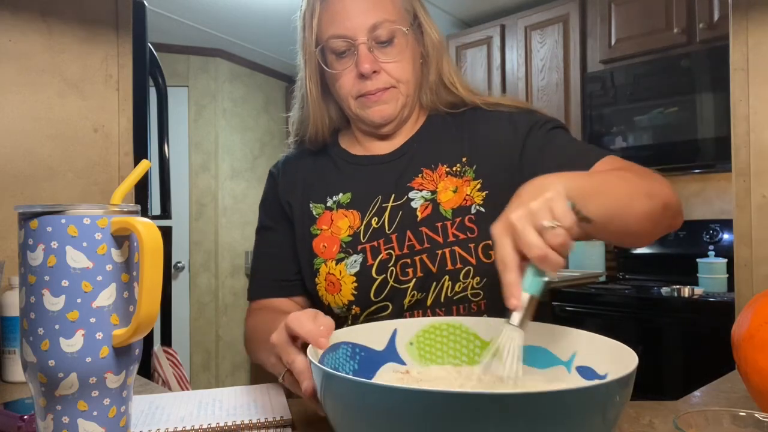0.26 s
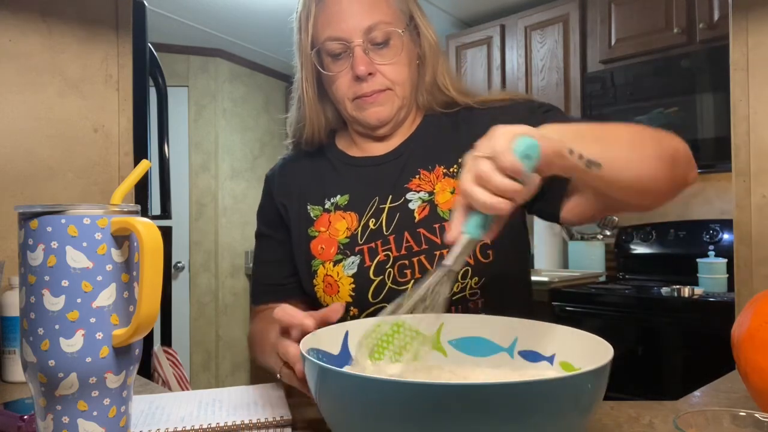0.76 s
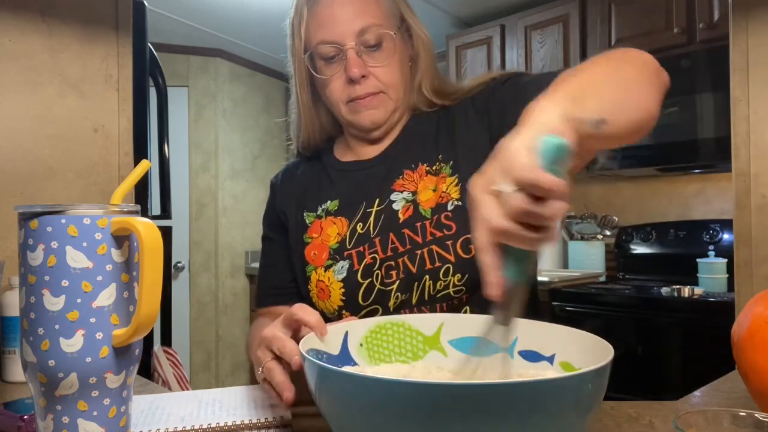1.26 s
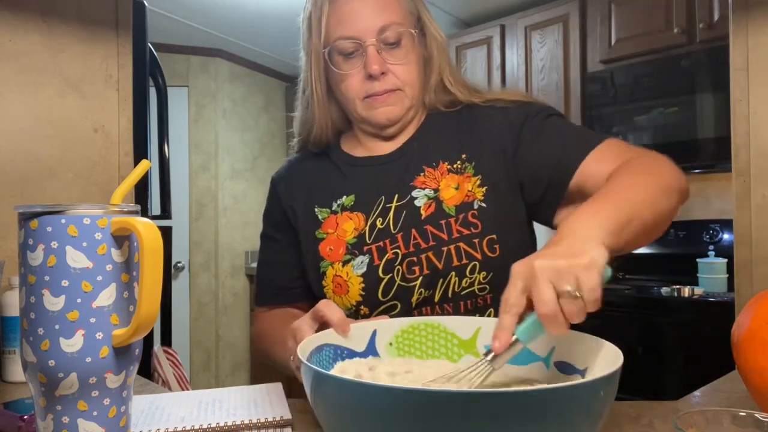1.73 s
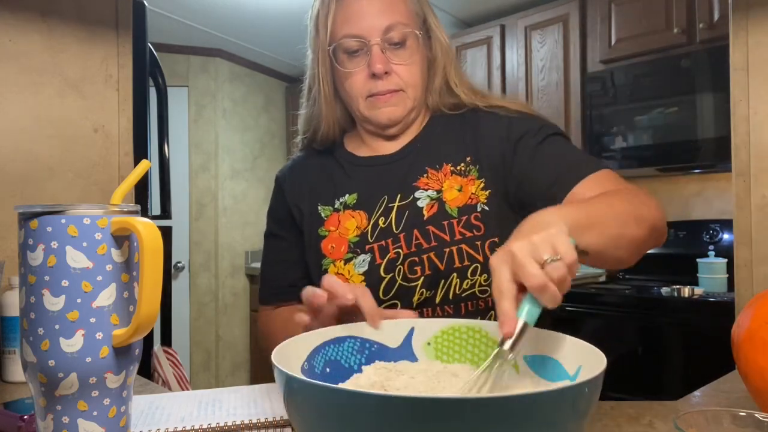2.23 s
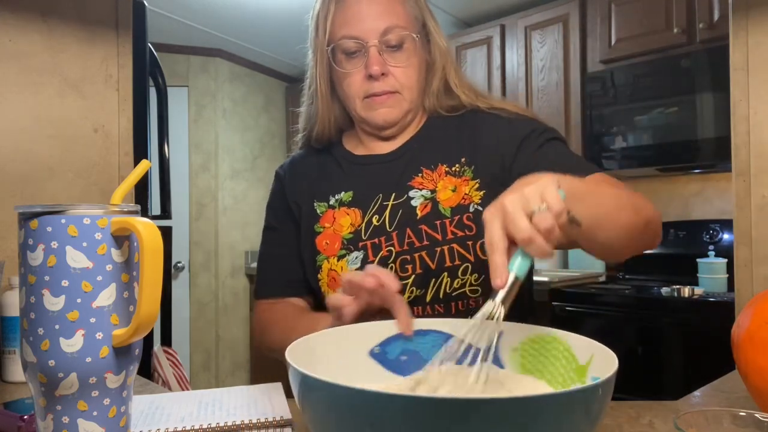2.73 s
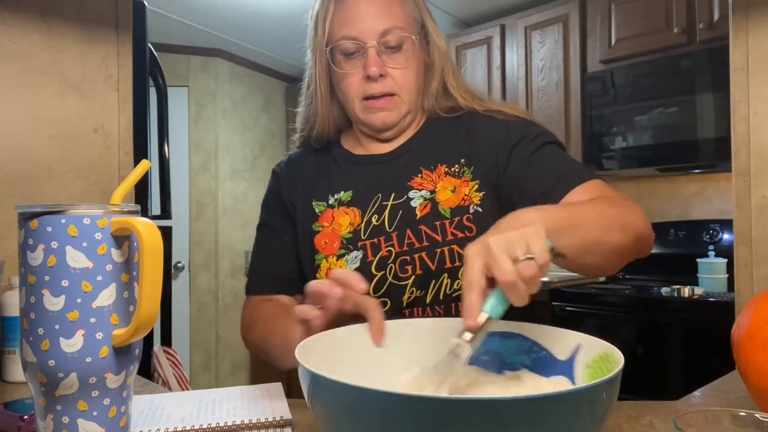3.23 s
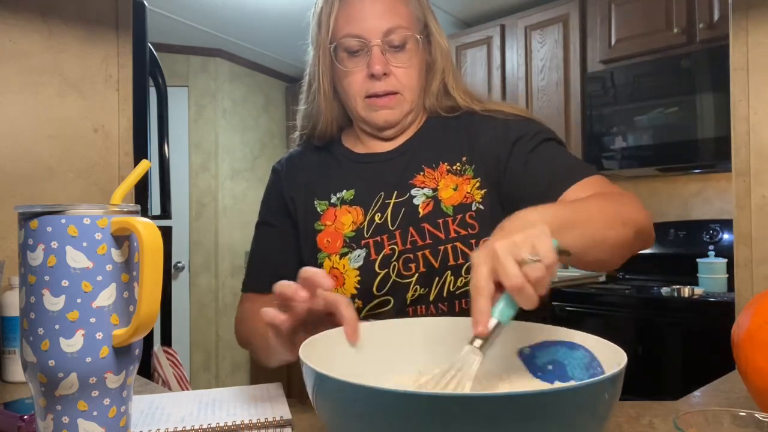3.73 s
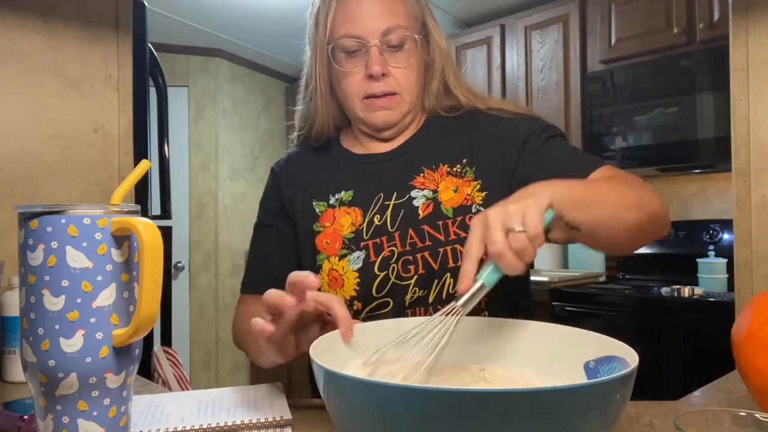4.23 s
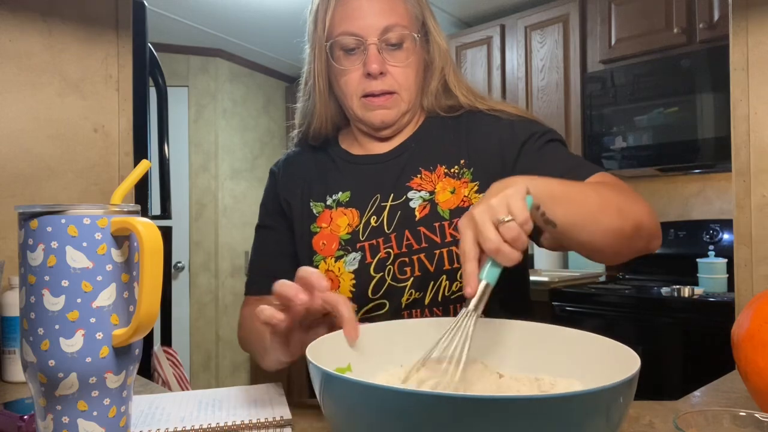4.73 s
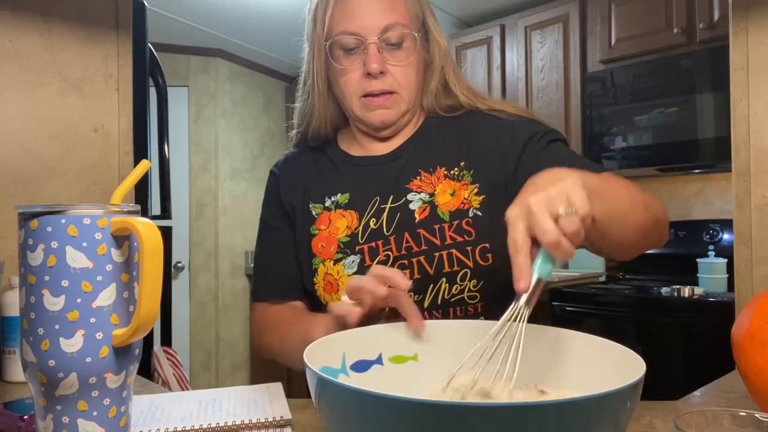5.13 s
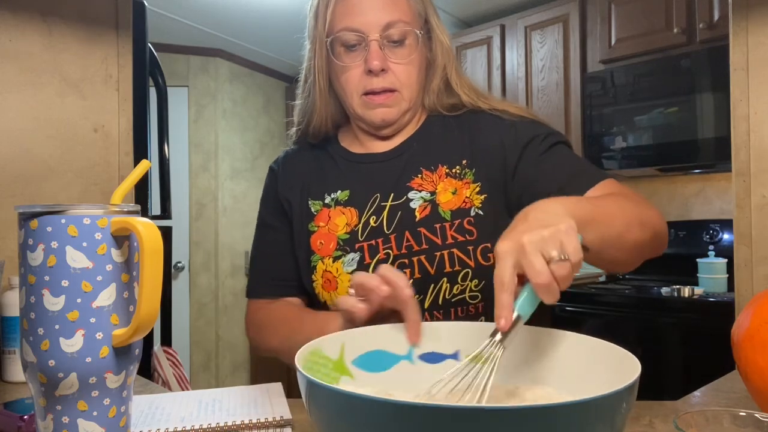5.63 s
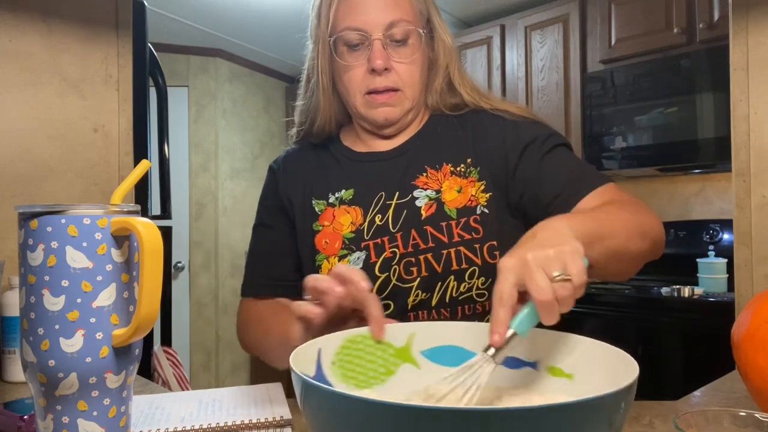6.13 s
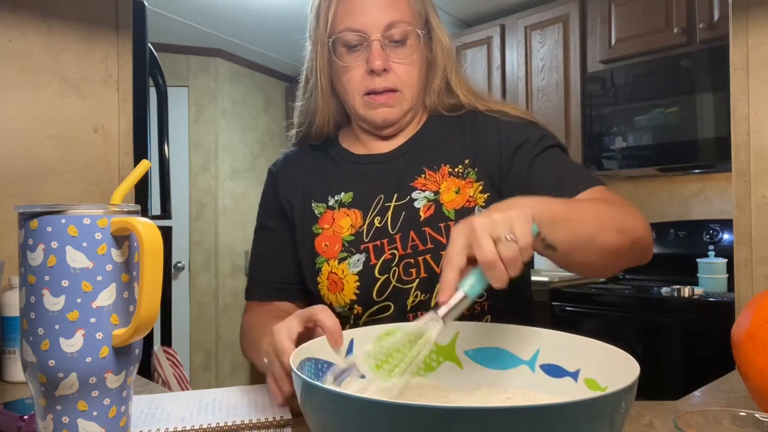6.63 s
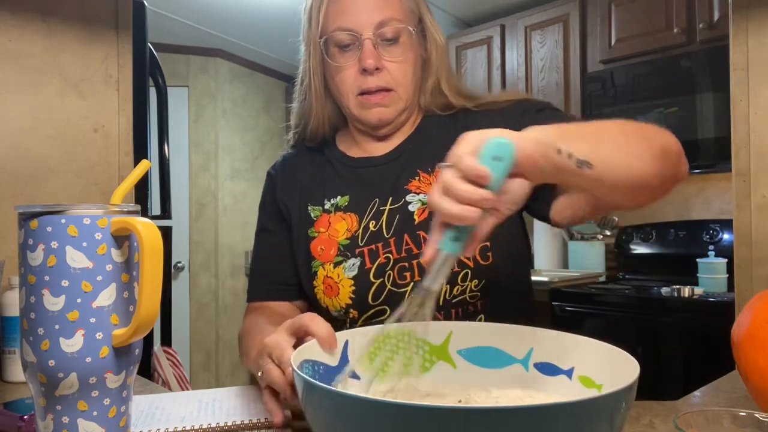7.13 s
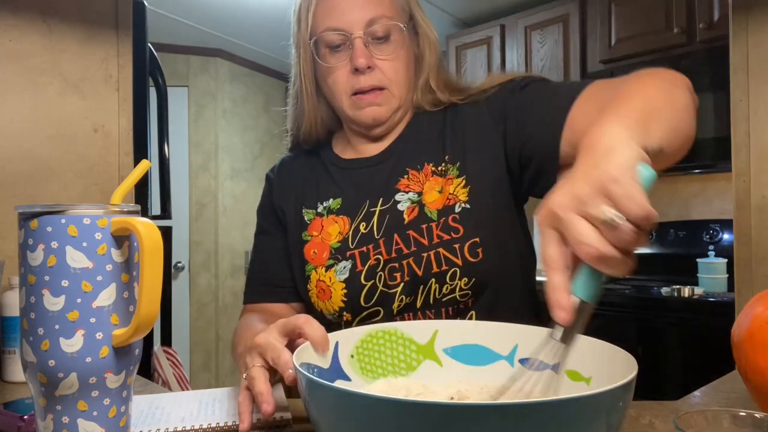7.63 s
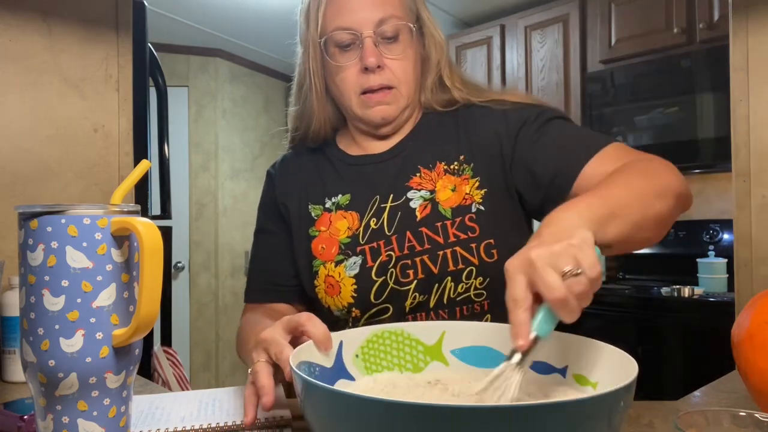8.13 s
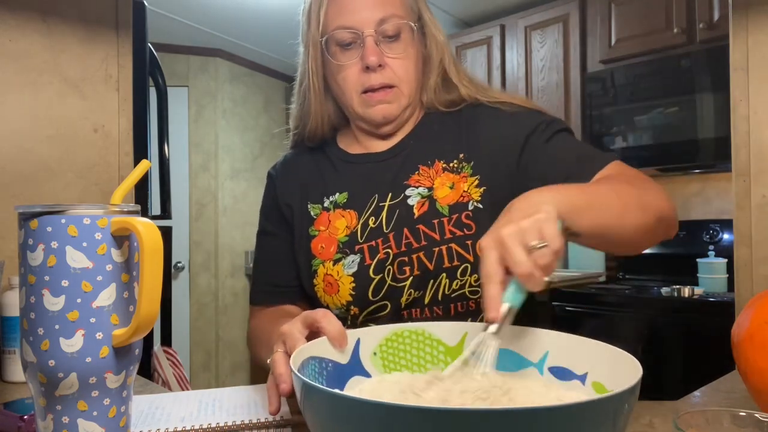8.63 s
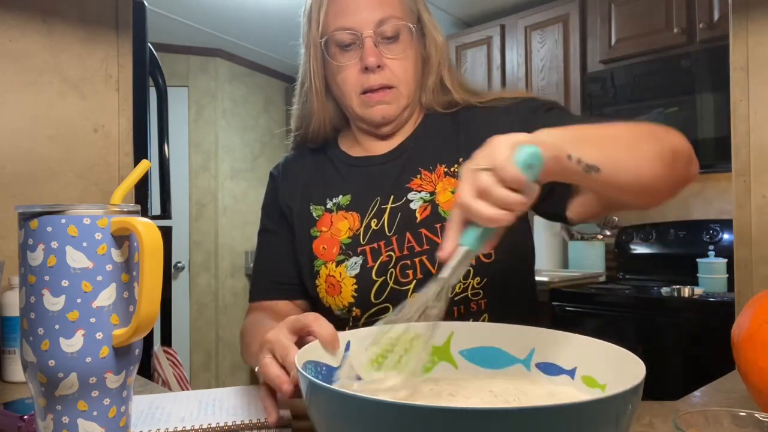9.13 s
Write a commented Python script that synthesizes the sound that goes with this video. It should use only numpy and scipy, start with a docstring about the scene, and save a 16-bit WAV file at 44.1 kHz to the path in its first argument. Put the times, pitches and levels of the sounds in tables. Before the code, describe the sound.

A wire whisk swishes round a large bowl of flour, crunching, tapping and ringing against the wall, over a low beating appliance hum.

```python
"""A wire whisk is drawn round a large bowl of flour on a kitchen counter, close to a two-port microphone.
Flour crunches and hisses as coloured slips; wire loops sing where they drag and clatter in struck modes.
Now and then the bowl shifts, two wires click together, or a loop skids or scratches along the bare wall.
Behind it an appliance rushes softly; its motor runs just under the mains frequency, so the hum slowly beats."""
import sys
import numpy as np
from scipy import signal
from scipy.fft import rfft, irfft, next_fast_len
from scipy.io import wavfile
from scipy.ndimage import uniform_filter1d

SR = 44100
rng = np.random.default_rng(int(sys.argv[2]) if len(sys.argv) > 2 else 0)


def master(y):
    """Save y as 16-bit WAV."""
    cut = np.clip(np.atleast_2d(y).T, -1, 1)
    pcm = np.round(cut * 32767)  # scale
    wavfile.write(sys.argv[1], SR, pcm.astype(np.int16))


N = 413216   # length in samples

# Modes of the wire loops. Each row: frequency in Hz, level in dB, undamped 60 dB decay in s.
WIRE_MODES = [(2620, -4.5, 0.15), (2797, -1.5, 0.22), (3010, -1, .14), (3107, -3, 0.11), (3305, 1, 0.11),
              (3606, -0.5, 0.22), (3746, -0.5, 0.25), (4210, -1.5, 0.08), (4650, -0.5, 0.039),
              (5710, -10.5, .05), (6430, -4.5, .05), (7180, -2, .056), (10500, 3, .025)]


def from_db(db):
    """Decibels to gain."""
    return 10 ** (np.asarray(db) / 20)


def rms_one(x):
    """Scale to an rms of 1."""
    return x / np.sqrt(np.mean(x ** 2) + 1e-20)


def at_hz(points, hz):
    """Read a curve of (Hz, value) points on a log-frequency axis."""
    point_hz, value = np.transpose(points)
    return np.interp(np.log(hz + 1e-9), np.log(point_hz), value)


def colour(x, spectrum):
    """Filter a signal by a spectrum in dB; rms 1."""
    size = next_fast_len(len(x))
    gain = from_db(at_hz(spectrum, np.fft.rfftfreq(size, 1 / SR)))
    return rms_one(irfft(rfft(x, size) * gain, size)[:len(x)])


def drift(rate):
    """Straight lines between normal random values, `rate` of them a second."""
    return np.interp(np.arange(N) / SR * rate, np.arange(N), rng.standard_normal(N))


def grains(per_s, spread_db, clump_db, clump_rate):
    """Tiny slips of uneven size whose strength swells in clumps."""
    at = np.flatnonzero(rng.random(N) < per_s / SR)
    chance = rng.random(N)[at]
    clumps = np.interp(at / SR * clump_rate, np.arange(N // 100), rng.standard_normal(N // 100))
    size_db = spread_db * np.minimum(-np.log(chance), 4)
    out = np.zeros(N)
    out[at] = (-1.) ** at * from_db(size_db + clump_db * clumps)
    return out


def ring(force, hz, t60):
    """One mode: a unit click sets a sine of height 1 ringing."""
    radius, turn = from_db(-60 / (t60 * SR)), 2 * np.pi * hz / SR
    return signal.lfilter([0, np.sin(turn)], [1, -2 * radius * np.cos(turn), radius * radius], force + 1e-18)


def swells(peak_s, rise_s, fall_s, level_db, size=64):
    """Gain of overlapping pushes: each builds to its hardest moment and eases off; their powers add."""
    edge_db = 10   # drop from the peak to the end of the rise or fall
    rise_power, fall_power = 1.89, 1.95   # roundness in dB: 1 pointed, 2 a bell
    t = np.arange(0, N + size, size) / SR
    since = t[:, None] - peak_s
    rising = np.abs(since / rise_s) ** rise_power
    falling = np.abs(since / fall_s) ** fall_power
    away = np.where(since < 0, rising, falling)
    power = np.sum(from_db(level_db - edge_db * away) ** 2, axis=1)
    return np.interp(np.arange(N) / SR, t, np.sqrt(power))


def shifting(x, depth_db, size=512, order=5):
    """The moving wires keep changing the colour: each narrow band swells and fades by itself; rms 1."""
    cells = signal.stft(x, nperseg=size)[2]
    patches = uniform_filter1d(rng.standard_normal(cells.shape), order, axis=0)
    patches = uniform_filter1d(patches, order, axis=1)
    moved = cells * from_db(depth_db * rms_one(patches))
    return rms_one(signal.istft(moved, nperseg=size)[1][:N])


def favoured(modes, near_hz, boost_db, width):
    """A body's modes, with those brought out that suit the place where it is touched."""
    return [(hz, db + boost_db * np.exp(-(np.log(hz / near_hz) / width) ** 2), t60) for hz, db, t60 in modes]


def detuned(modes, spread):
    """Grip and flour shift each mode a little from knock to knock."""
    return [(hz * np.exp(spread * rng.standard_normal()), db, t60) for hz, db, t60 in modes]


def struck(force, modes, uneven_db, damping=1, size=660):
    """A body's answer to one knock, each mode lifted by a random amount; rms 1 over the attack."""
    out = 0
    for hz, db, t60 in modes:
        mode = ring(force, hz, t60 * damping)
        out = out + from_db(db + uneven_db * rng.random()) * mode / mode[:size].std()
    return out / out[:size].std()


def hum(waver):
    """A mains tone and the harmonics of a slightly slower motor drift in and out of step."""
    # Motor harmonics. Each row: multiple of the motor frequency, level in dB rms.
    harmonics = [(1, -38), (2, -60.5), (3, -58), (4, -51), (5, -72.5), (6, -57.5), (7, -64)]
    mains_hz, mains_db = 59.995, -34.5   # level in dB rms
    motor_hz, in_step_s = 59.345, .6   # in step near this moment, give or take the waver
    t = np.arange(N) / SR - in_step_s
    turn = 2 * np.pi * motor_hz * t + waver * drift(5.4)
    motor = sum(from_db(db) * np.cos(round(k) * turn) for k, db in harmonics)
    mains = from_db(mains_db) * np.cos(2 * np.pi * mains_hz * t)
    return np.sqrt(2) * (motor + mains)


def appliance_rush(level_db):
    """The steady rush of the appliance across the kitchen: coloured noise."""
    # Each row: frequency in Hz, relative level in dB per Hz.
    rush_spectrum = [(20, -15), (50, 3.5), (85, 0.5), (120, -4), (200, -7.5), (300, -11), (400, -11),
                     (560, -24), (850, -21.5), (1300, -36), (2200, -45), (6000, -73), (12000, -45),
                     (13800, -38), (14500, -66.5)]
    return from_db(level_db) * colour(rng.standard_normal(N), rush_spectrum)


def stirring():
    """How hard strokes and bowl shifts drive the crunch, the hiss, the wires and the bowl, as gains."""
    # The whisk is pushed through the flour. Each row: hardest moment, rise and fall in seconds,
    # then levels in dB: crunch of packed flour, hiss of sliding, singing of the wires.
    strokes = [ (.06, 0.066, 0.15, -47, -39.5, -43.5), (.38, 0.13, 0.14, -30, -36, -37),
               (1.0, 0.11, 0.34, -42.5, -46.5, -52), (1.2, 0.2, 0.16, -52, -33.5, -30.5),
               (1.38, 0.14, 0.28, -45, -39, -46), (1.56, 0.039, 0.076, -34.5, -34, -47),
               (1.68, 0.095, 0.13, -34.5, -46, -43), (1.83, 0.27, 0.11, -46, -41, -42),
               (2.02, 0.065, 0.11, -35.5, -38, -52), (2.18, 0.091, 0.05, -34, -38, -40.5),
               (2.37, 0.23, 0.09, -51.5, -42.5, -67), (2.55, 0.12, 0.18, -38, -37, -42),
               (2.76, 0.21, 0.15, -37, -48.5, -46), (3.07, 0.047, 0.13, -36, -33.5, -35.5),
               (3.27, 0.22, 0.075, -36, -48, -48), (3.42, 0.2, 0.056, -37.5, -43, -47),
               (3.56, 0.079, 0.11, -56, -43.5, -63), (3.73, 0.13, 0.11, -33.5, -39.5, -41),
               (3.91, 0.16, 0.081, -37, -46, -47.5), (4.08, 0.042, 0.046, -75, -57, -70),
               (4.231, 0.059, 0.1, -36.5, -31.5, -38.5), (4.38, 0.17, 0.18, -34.5, -42, -41.5),
               (4.7, 0.067, 0.47, -58, -44, -70), (4.92, 0.1, .14, -32, -41, -39),
               (5.27, 0.02, 0.09, -75, -56.5, -80), (5.43, 0.077, 0.078, -40, -37, -47),
               (5.48, 0.073, 0.16, -33, -40.5, -40.5), (5.69, 0.12, 0.094, -36.5, -46.5, -48),
               (5.89, 0.051, 0.24, -49, -42.5, -55), (6.01, 0.064, 0.14, -36, -38, -46),
               (6.11, 0.086, 0.15, -32.5, -40, -40.5), (6.44, 0.12, 0.082, -68, -54, -76),
               (6.61, 0.032, 0.059, -49.5, -38, -57), (6.72, 0.047, 0.12, -73, -58.5, -65.5),
               (7.17, 0.13, 0.18, -46, -81, -77), (7.38, 0.19, .1, -62, -46.5, -47.5),
               (7.52, 0.14, 0.19, -50.5, -35.5, -36.5), (7.72, 0.22, 0.28, -56, -42.5, -45),
               (7.95, 0.13, 0.18, -47.5, -45.5, -63), (8.15, 0.044, 0.05, -44.5, -39.5, -44.5),
               (8.32, 0.21, 0.11, -44.5, -53, -67), (8.57, 0.98, 0.18, -48.5, -40.5, -65),
               (8.82, 0.17, 0.062, -45, -38, -48), (8.98, 0.09, 0.15, -49.5, -68, -82),
               (9.14, 0.13, 0.17, -42, -52, -72), (9.351, 0.08, 0.086, -61, -40.5, -40.5)]
    # The bowl shifts on the counter. Each row: loudest moment, rise and fall in seconds, level in dB.
    bowl_shifts = [(.04, 0.025, 0.052, -37.5), (0.551, .06, 0.029, -43), (2.25, 0.054, 0.064, -45),
                   (2.77, 0.066, 0.068, -40), (3.31, .03, 0.037, -41), (3.52, 0.086, 0.096, -45),
                   (3.88, 0.16, 0.051, -47), (4.61, .1, 0.11, -41), (4.8, 0.028, 0.042, -38),
                   (5.04, 0.061, 0.12, -37), (5.96, 0.086, 0.044, -44), (6.13, 0.028, 0.025, -35),
                   (6.24, 0.022, 0.044, -34.5)]
    # How much the bowl shakes with the crunch, less while a hand holds it down.
    # Each row: time in seconds, level against the crunch in dB.
    looseness = [(.5, -12), (1.5, -12.5), (2.6, -4), (3.3, -7.5), (3.8, -3), (4.3, -2.5), (6.2, -3.5),
                 (7.2, 1), (8.3, -2.5), (9.2, -3.5)]
    hiss_lead_s = 0.006   # the wires slide through loose flour before they reach the packed flour
    rumble_lag_s = 0.0051   # the bowl answers a little after the crunch
    resting_crunch_db, resting_hiss_db = -68, -68.5   # between strokes the flour goes on settling
    s, rise, fall, crunch_db, hiss_db, wire_db = np.transpose(strokes)
    crunch = np.hypot(swells(s, rise, fall, crunch_db), from_db(resting_crunch_db))
    hiss = np.hypot(swells(s - hiss_lead_s, rise, fall, hiss_db), from_db(resting_hiss_db))
    wires = swells(s, rise, fall, wire_db)
    shaken_db = crunch_db + np.interp(s, *np.transpose(looseness))
    shaken = swells(s + rumble_lag_s, rise, fall, shaken_db)
    rumble = np.hypot(shaken, swells(*np.transpose(bowl_shifts)))
    return crunch, hiss, wires, rumble


def flour(crunch_gain, hiss_gain, rumble_gain):
    """Packed flour slips coarsely and shakes the bowl; loose flour hisses in fine slips, thinner if light."""
    # Spectra of packed flour, loose flour and bowl. Each row: frequency in Hz, relative level in dB per Hz.
    crunch_spectrum = [(150, 8.5), (300, 1.5), (450, 5.5), (600, 6), (800, 5), (1050, 5), (1400, -4),
                       (2000, -6), (3000, -5), (6000, -12.5), (13800, -46.5), (14500, -52.5)]
    hiss_spectrum = [(700, -48.5), (1500, -3.5), (2200, 2), (3300, 3.5), (5000, 4.5), (6300, 0.5),
                     (8300, 10), (10000, 4), (12000, 5.5), (13800, 5), (15400, -9), (16000, -28)]
    rumble_spectrum = [(60, -47), (100, -31), (138, 3), (195, -10), (255, -5.5), (320, -12), (480, -15.5),
                       (1000, -51.5)]
    # a light touch moves only the finest flour: the lower hiss loses this many more dB per dB
    fine_above_hz, firm_hiss_db, coarse_growth = 11000, -42.5, 0.25
    crunch = colour(grains(per_s=1100, spread_db=1.0, clump_db=1.5, clump_rate=90), crunch_spectrum)
    crunch = shifting(crunch, depth_db=3.0)
    rumble = colour(grains(per_s=760, spread_db=1.5, clump_db=5.0, clump_rate=27), rumble_spectrum)
    hiss = colour(grains(per_s=4500, spread_db=1.0, clump_db=1.5, clump_rate=90), hiss_spectrum)
    hiss = shifting(hiss, depth_db=4.5)
    coarse = signal.sosfiltfilt(signal.butter(2, fine_above_hz, fs=SR, output="sos"), hiss)
    fine = hiss - coarse
    hiss = fine + coarse * (hiss_gain / from_db(firm_hiss_db)) ** coarse_growth
    return crunch_gain * crunch + rumble_gain * rumble + hiss_gain * hiss


def singing_wires(damping, wander_db, bend):
    """Loops catch on the wall one by one and ring, damped by flour, pitch wandering as they bend; rms 1."""
    out = 0
    for hz, mode_db, t60 in WIRE_MODES:
        slips = grains(per_s=600, spread_db=2.0, clump_db=wander_db, clump_rate=45)
        mode = ring(slips, hz, t60 * damping)
        flexed = np.cumsum(1 + bend * drift(14)) % N   # uneven reading speed bends the pitch
        out = out + from_db(mode_db) * rms_one(np.interp(flexed, np.arange(N), mode))
    chatter = from_db(2.9 * drift(140))   # the whole whisk judders as it drags
    return rms_one(out * chatter)


def taps(clatter_s, size=8192):
    """The loops land within milliseconds and rattle on: a tick, ringing wires and wall, and a thump."""
    # The whisk knocks the bowl. Each row: start in seconds, levels in dB of tick, thump, wall ring and
    # wire ring, then pitches in Hz of the thump, of the wall where it is hit and of the loop that lands.
    knocks = [(0.027, -35, -33.5, -40, -38, 120, 1070, 2640), (0.3648, -47, -25, -37, -33, 310, 920, 3120),
              (0.4481, -28, -55, -39, -31.5, 265, 760, 3300),
              (0.8629, -15, -53, -28.5, -19.5, 265, 1200, 3010),
              (0.8705, -26, -28.5, -28, -25.5, 130, 665, 3000),
              (0.9698, -34, -36, -34.5, -33.5, 170, 664, 3110),
              (1.424, -40, -47, -55, -30.5, 169, 920, 2750),
              (2.4476, -19.5, -57, -32, -29.5, 360, 1060, 3040),
              (2.4634, -21, -30, -36, -50, 265, 1870, 2800), (2.5111, -28, -36, -37, -50, 265, 920, 2630),
              (2.528, -41, -44, -29, -44, 171, 633, 3760), (3.0018, -25, -50, -27.5, -32.5, 190, 707, 3270),
              (3.0092, -19, -30, -25, -24.5, 230, 637, 3230),
              (3.0162, -31, -48, -39, -26.5, 230, 1050, 3610),
              (3.5171, -44, -38, -50, -40.5, 170, 620, 3720),
              (4.1285, -27.5, -46, -37.5, -40, 170, 1870, 3160),
              (4.1341, -48, -26.5, -31, -33.5, 265, 590, 3300),
              (4.6804, -53, -47, -45, -44, 265, 615, 3360),
              (5.317, -27, -34.5, -39, -37, 170.3, 2370, 3255),
              (5.3227, -42, -28, -36, -38, 260, 640, 3290), (5.3948, -28, -44, -54, -39, 170, 920, 3240),
              (5.84, -38, -32, -40, -43, 290, 655, 3210), (5.9813, -25, -32.5, -32.5, -34, 265, 1870, 3590),
              (5.999, -23.5, -34, -37, -43, 170, 740, 2740), (6.564, -33, -44, -49, -41, 265, 660, 2900),
              (6.574, -31, -40, -48, -36.5, 265, 660, 2920), (7.17, -36.5, -42, -40, -43.5, 265, 660, 2850),
              (7.492, -25.5, -60, -53, -44, 265, 1200, 3340), (7.554, -24, -63, -51, -43, 265, 1060, 3120),
              (7.5765, -29, -62, -51, -37, 265, 1200, 2660),
              (7.7003, -29, -44, -36.5, -32, 265, 1050, 3100),
              (9.166, -26.5, -48, -36, -42, 190, 920, 3020),
              (9.1809, -30, -28.5, -33, -36, 360, 1060, 3010),
              (9.189, -45, -26, -53, -35.5, 105, 1200, 3010)]
    # The bowl rocking on the counter, then its wall.
    # Each row: frequency in Hz, level in dB, undamped 60 dB decay in s.
    base_modes = [(83, -5.5, 0.22), (130.2, 1, 0.26), (169.7, -6, 0.32), (262, 0, 0.13), (294, 2.5, 0.11),
                  (364, -9, 0.147)]
    wall_modes = [(543, -18.5, .07), (577, -5.5, .07), (614, -4.5, 0.08), (671, -3.5, 0.083),
                  (777, -9.5, .05), (925, -7, 0.15), (1032, -2.5, 0.071), (1230, -12, .06), (1255, -9, .06),
                  (1430, -6.5, 0.043), (1873, -6.5, 0.04), (2360, -10, .08)]
    # The loop that lands rings above the others.
    # Each row: multiple of its pitch, level in dB, undamped 60 dB decay in s.
    loop_modes = [(1.001, 13, 0.056), (1.035, -7, 0.2), (1.95, 1, .06), (2.034, 6, 0.089), (3.58, 0, 0.06)]
    # Each row: frequency in Hz, relative level in dB per Hz.
    tick_spectrum = [(300, -39), (1000, 0.5), (2200, -21), (3000, 6.5), (4200, 3.5), (5300, 2.5), (6100, 0),
                     (7300, -0.5), (8500, 11), (10700, 3.5), (13000, 0.5), (16000, -2)]
    tick_decay_s = 0.0074
    rattle_db, rattle_s = -26.5, .028   # the loops go on bouncing lightly after a knock
    hard_tap_db, overtone_growth = -21.5, 1.7   # a softer landing loses overtones: dB per dB and octave
    out, t = np.zeros(N + size), np.arange(size) / SR
    bouncing = np.exp(-t / clatter_s) + from_db(rattle_db) * np.exp(-t / rattle_s)
    for s, tick_db, thump_db, wall_db, wire_db, thump_hz, wall_hz, loop_hz in knocks:
        clatter = rng.standard_normal(size) ** 3 * bouncing   # cubing makes sparse strong hits
        tilt_db = overtone_growth * (wire_db - hard_tap_db)
        loop = [(k * loop_hz, db + tilt_db * np.log2(k), t60) for k, db, t60 in loop_modes]
        wires = loop + detuned(WIRE_MODES, spread=.009)
        wall = detuned(favoured(wall_modes, wall_hz, boost_db=13.5, width=0.17), spread=.012)
        base = favoured(base_modes, thump_hz, boost_db=10.5, width=0.38)
        tick = colour(rng.standard_normal(size), tick_spectrum) * np.exp(-t / tick_decay_s)
        knock = from_db(tick_db) * tick
        knock += from_db(thump_db) * struck(clatter, base, uneven_db=0.0, damping=.85)
        knock += from_db(wall_db) * struck(clatter, wall, uneven_db=4.5, damping=0.9)
        knock += from_db(wire_db) * struck(clatter, wires, uneven_db=1.0, damping=0.76)
        start = int(s * SR)
        out[start:start + size] += knock
    return out[:N]


def clicks(size=2048):
    """Wire meets wire in one short bright tick that leaves the bowl still."""
    # Each row: start in seconds, level in dB, centre of the tick in Hz, decay in seconds.
    wire_contacts = [(0.35, -13, 7460, .0008), (0.8702, -11, 12000, .0016), (2.5178, -22, 9500, .0013),
                     (2.859, -28, 10500, 0.0029), (2.866, -31, 3500, .002), (3.0113, -18, 5700, .0022),
                     (3.952, -32, 11000, .0013), (5.396, -28, 7500, .002), (6.502, -43, 12500, 0.0025),
                     (6.5125, -42, 4940, 0.0021), (7.2265, -25, 9500, 0.0035), (8.282, -25, 9000, 0.0022)]
    # Spectrum of a click. Each row: multiple of its centre, relative level in dB.
    click_spectrum = [(.08, -25), (.3, -7.5), (.7, -1.5), (1, -2.5), (1.6, -7), (3, -12)]
    out, t = np.zeros(N + size), np.arange(size) / SR
    for s, db, centre_hz, decay_s in wire_contacts:
        spectrum = [(k * centre_hz, level_db) for k, level_db in click_spectrum]
        tick = colour(rng.standard_normal(size), spectrum)
        start = int(s * SR)
        out[start:start + size] += from_db(db) * tick * np.exp(-t / decay_s)
    return out[:N]


def skids(jitter, slowing, judder_db, uneven_db, size=4096, count=40):
    """On the bare wall a wire sticks and slips in a juddering rasp, its rate sinking as the loop unbends."""
    # A wire skids over the bare wall. Each row: start and length in seconds, level in dB, rasp pitch in Hz.
    wall_skids = [(1.148, .006, -23, 2950), (1.163, 0.0072, -29, 3030), (1.173, 0.0055, -27, 3000),
                  (1.196, .014, -24.5, 2860), (1.212, 0.0056, -21.5, 2900), (1.234, 0.014, -24, 2800),
                  (1.255, 0.0052, -24, 2700), (1.268, 0.0055, -23, 2810), (1.326, 0.013, -26.5, 2600),
                  (1.37, .005, -30, 2900), (1.393, 0.005, -31, 3200), (1.451, 0.013, -34, 2880),
                  (1.866, 0.012, -48, 1930), (2.004, 0.0082, -43, 2370), (2.177, 0.028, -41, 2920),
                  (7.355, 0.0079, -46, 2900), (7.458, 0.012, -34, 2970), (7.485, 0.012, -29, 3200),
                  (7.549, 0.015, -27, 2380), (7.575, 0.0079, -33, 2500), (7.602, 0.013, -29, 2700),
                  (7.638, 0.0089, -30, 3160), (7.686, 0.01, -32, 2850), (7.698, 0.0061, -41, 1500),
                  (7.733, 0.012, -32, 3000), (7.743, 0.0098, -39, 2920), (7.797, 0.013, -32.5, 2480),
                  (7.81, 0.0089, -43, 1440), (7.928, 0.012, -45, 1480), (8.075, 0.012, -41.5, 1400),
                  (8.136, 0.0093, -33, 3450), (8.152, .012, -30, 3540), (8.166, 0.012, -38, 3550),
                  (8.281, 0.011, -37, 1320), (8.403, 0.013, -39.5, 1550), (8.444, .026, -38, 3500),
                  (8.522, 0.013, -33.5, 3620), (8.541, 0.0088, -38, 2900), (8.594, 0.021, -38, 1300),
                  (8.62, 0.013, -38, 1180), (8.648, 0.013, -42.5, 1130), (8.684, .012, -51, 1980),
                  (8.718, .012, -44, 1910), (8.739, 0.013, -45, 900), (8.753, 0.0095, -39, 1560),
                  (8.803, 0.015, -30.5, 1890), (8.855, 0.016, -41, 1940)]
    # A skidding wire. Each row: frequency in Hz, relative level in dB per Hz.
    scratch_spectrum = [(400, -15), (700, 13), (1200, 4.5), (2400, 2), (3700, 10), (4600, -0.5),
                        (9000, -18), (16000, -36)]
    # The peak of a rasp. Each row: multiple of its pitch, relative level in dB.
    rasp_peak = [(.22, -17), (.5, -22), (.84, -7), (.96, 3.5), (1.04, 6), (1.16, -7), (1.8, -6), (2.05, -7),
                 (2.4, -11.5)]
    attack_s, ring_s = .0015, 0.0037   # the wire bites, and rings on after it lets go
    slip_hz, slip_spread = 649.5, .18   # typical stick-slip rate; its spread between skids as a share
    out, t = np.zeros(N + size), np.arange(size) / SR
    bands = np.geomspace(500, 7000, count)   # Hz
    for s, length, db, rasp_hz in wall_skids:
        along = np.minimum(t / length, 1)
        wobble, judder = rms_one(uniform_filter1d(rng.standard_normal((2, size)), size=70))
        rate = slip_hz * np.exp(slip_spread * rng.standard_normal() + jitter * wobble - slowing * along)
        slips = np.diff(np.floor(np.cumsum(rate) / SR), prepend=0)   # one click a cycle
        slips = slips * from_db(judder_db * judder)
        # each spot on the wall rings in its own way
        spot_db = at_hz(rasp_peak, bands / rasp_hz) + uneven_db * rng.standard_normal(count)
        rasp = colour(colour(slips, scratch_spectrum), list(zip(bands, spot_db)))
        rasp *= np.minimum(t / attack_s, 1) * np.exp(-np.maximum(t - length, 0) / ring_s)
        start = int(s * SR)
        out[start:start + size] += from_db(db) * rasp / rasp[along < 1].std()
    return out[:N]


def dragging():
    """Grit caught between wire and wall scratches in bunches of slips that set the wall ringing."""
    # The loops drag along the bare wall. Each row: hardest moment, rise and fall in seconds, level in dB.
    drags = [(7.59, .13, 0.11, -49), (8.15, 0.043, .06, -40), (8.28, .035, 0.059, -45.5),
             (8.45, .1, 0.13, -52), (8.62, 0.062, 0.062, -46), (8.78, 0.11, 0.078, -48)]
    # What sings under a dragging loop. Each row: frequency in Hz, level in dB, 60 dB decay in s.
    drag_modes = [(625, -2, .04), (912, -9, .06), (1090, -4, 0.055), (1240, 0, 0.036), (1395, 3.5, 0.046),
                  (1966, 2, 0.044), (2143, 3, 0.07), (2520, 3, .03), (3010, 0, 0.044), (3480, -1, .04),
                  (3650, -1, 0.044)]
    slips = grains(per_s=700, spread_db=3.0, clump_db=7.0, clump_rate=110)
    wall = 0
    for k, (hz, db, t60) in enumerate(drag_modes):
        wall = wall + (-1) ** k * from_db(db) * rms_one(ring(slips, hz, t60))
    return swells(*np.transpose(drags)) * rms_one(wall)


def whisk(crunch_gain, hiss_gain, wire_gain, rumble_gain):
    """What the whisk does in the bowl, all but the skids, as heard along one path."""
    sliding = flour(crunch_gain, hiss_gain, rumble_gain)
    singing = wire_gain * singing_wires(damping=0.22, wander_db=7.0, bend=.025)
    return sliding + singing + dragging() + taps(clatter_s=0.0066) + clicks()


def two_ports(direct, scattered):
    """Direct sound reaches the two ports out of phase; what the bowl scatters differs at each of them."""
    # Phase by which the left port leads. Each row: frequency in Hz, phase in radians.
    port_phase = [(20, 0), (150, .05), (450, 1.1), (900, 1.15), (1650, 0), (2600, 2.2), (3300, 2.5),
                  (5200, 2.5), (6000, 0), (7900, -1.6), (9000, -3.1), (9600, -3.2), (10200, -3.6),
                  (11600, -6.2), (12900, -6.5), (13850, -9.3), (14700, -9.42), (16000, -9.42)]
    # Reflections against the direct sound. Each row: frequency in Hz, level in dB.
    reflected = [(80, -18), (160, -10), (300, -3.5), (800, -3.5), (2000, -2), (3200, -2.5), (5000, -.5),
                 (7500, -4), (8600, -9), (9400, -20), (10600, -9), (12200, -15), (13300, -11), (14200, -24),
                 (16000, -24)]
    size = next_fast_len(N + 4096)
    hz = np.fft.rfftfreq(size, 1 / SR)
    turn = np.exp(.5j * at_hz(port_phase, hz) * np.array([[1], [-1]]))
    wet = from_db(at_hz(reflected, hz))
    mixed = rfft(direct, size) * turn + wet * rfft(scattered, size)
    return irfft(mixed / np.sqrt(1 + wet ** 2), size)[:, :N]


def kitchen(x, t60, room_db, size=20000):
    """A short, dull, diffuse tail from cupboards and walls, building up over the first milliseconds."""
    # What the kitchen sends back. Each row: frequency in Hz, relative level in dB.
    room_spectrum = [(100, 3.5), (6000, 3), (9000, -12), (13000, -12), (14500, -23.5)]
    t = np.arange(size) / SR
    tail = np.array([colour(noise, room_spectrum) for noise in rng.standard_normal((2, size))])
    tail *= from_db(-60 * t / t60) * np.minimum(t / 0.006, 1)
    tail /= np.sqrt(np.sum(tail[0] ** 2))
    return x + from_db(room_db) * signal.fftconvolve(x, tail, axes=1)[:, :N]


def scene():
    """Whisk and bowl in the kitchen, over the hum and the rush of the appliance."""
    gains = stirring()
    # one direct path and one scattered path to each port, each with its own random draws
    direct, *scattered = [whisk(*gains) + appliance_rush(level_db=-48.0) for path in range(3)]
    # high on the wall, in plain view of the ports
    squeaks = skids(jitter=.14, slowing=.1, judder_db=4.5, uneven_db=7.0)
    close = two_ports(direct + squeaks, np.array(scattered))
    return kitchen(close, t60=0.19, room_db=-14.0) + hum(waver=0.028)


def record(dry):
    """Each port has its own colour; the deep bass is rolled off and the top is cut steeply."""
    # Left port minus right port. Each row: frequency in Hz, level difference in dB.
    port_balance = [(60, -2.7), (150, -4), (350, -5), (900, 0.3), (2500, -0.5), (4000, 0.6), (5900, 2),
                    (8000, -1.5), (10000, -2), (13000, 1), (16000, -7)]
    low_cut_hz, cutoff_hz = 51.7, 15900
    size = next_fast_len(N + 4096)
    hz = np.fft.rfftfreq(size, 1 / SR)
    ports = from_db(at_hz(port_balance, hz) * np.array([[.5], [-.5]]))
    bass_cut = hz ** 3 / np.sqrt(hz ** 6 + low_cut_hz ** 6)
    heard = irfft(rfft(dry, size) * ports * bass_cut, size)[:, :N]
    return signal.sosfilt(signal.ellip(10, .2, 80, cutoff_hz, fs=SR, output="sos"), heard)


dry = scene()
out = record(dry)
master(out)
```